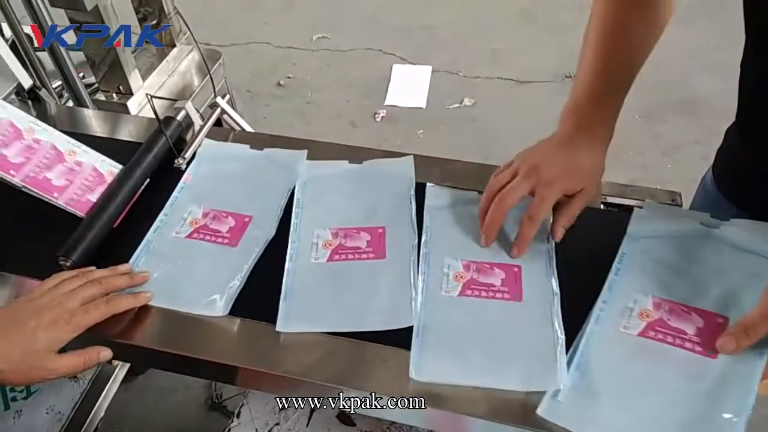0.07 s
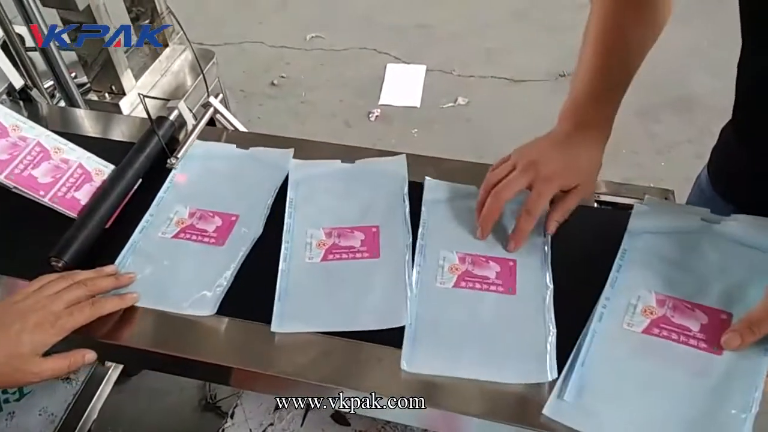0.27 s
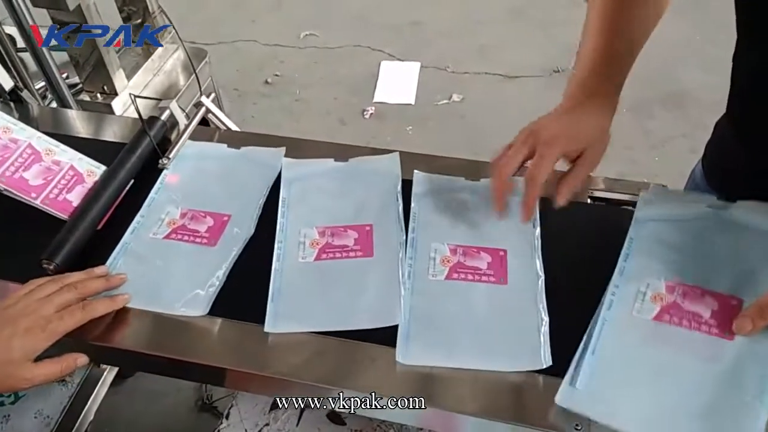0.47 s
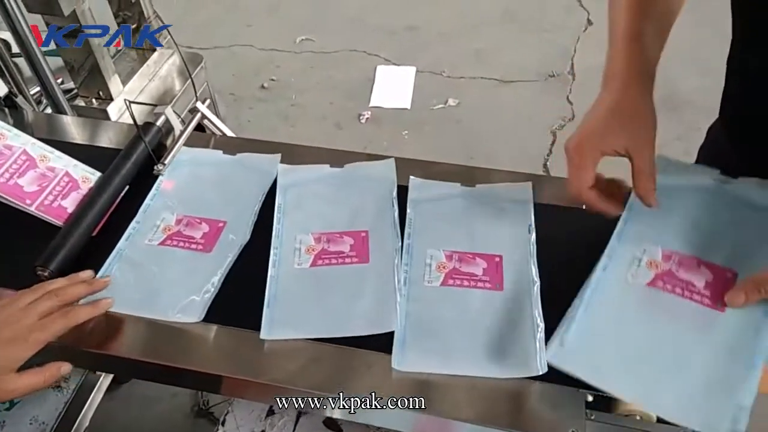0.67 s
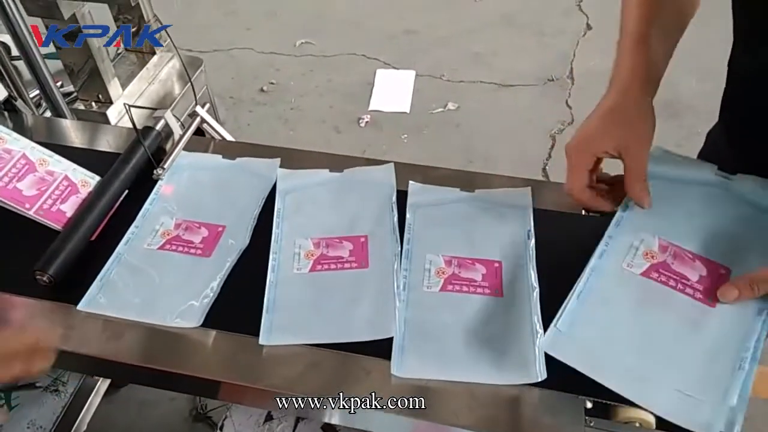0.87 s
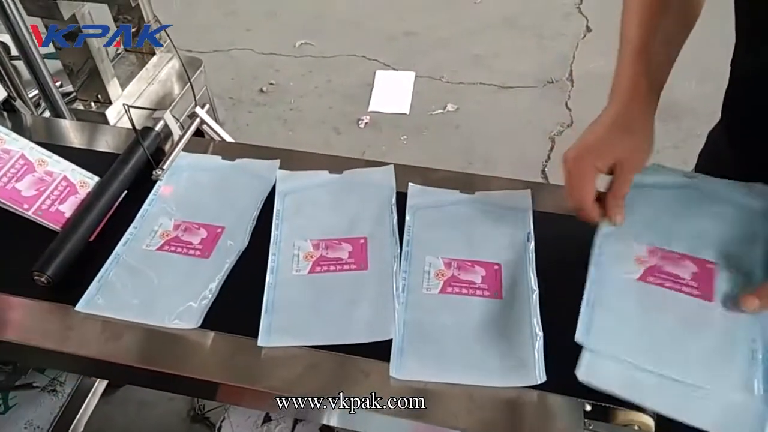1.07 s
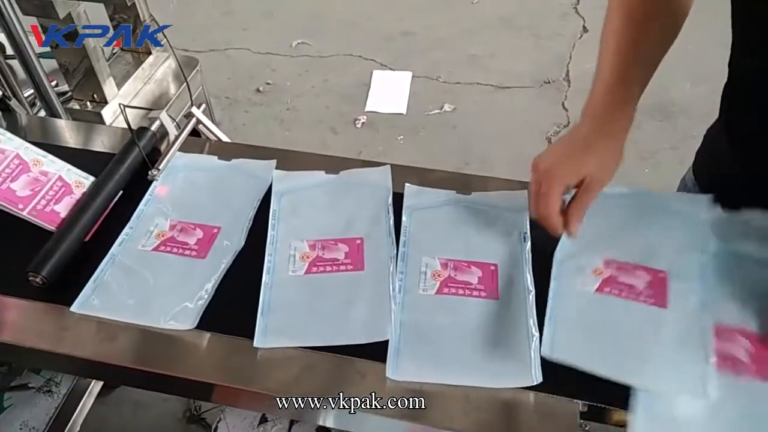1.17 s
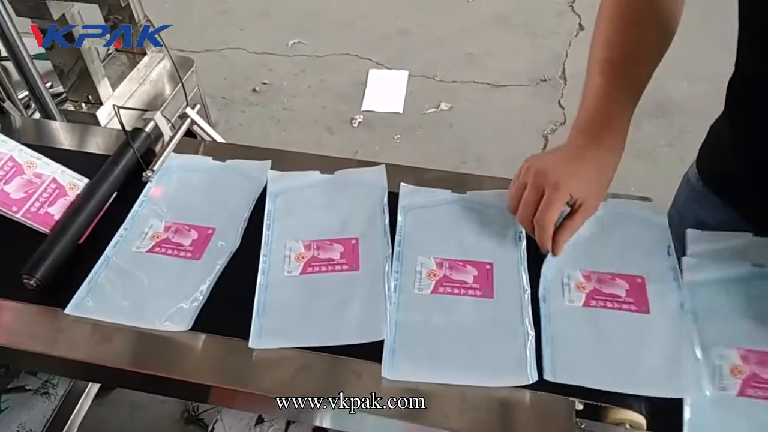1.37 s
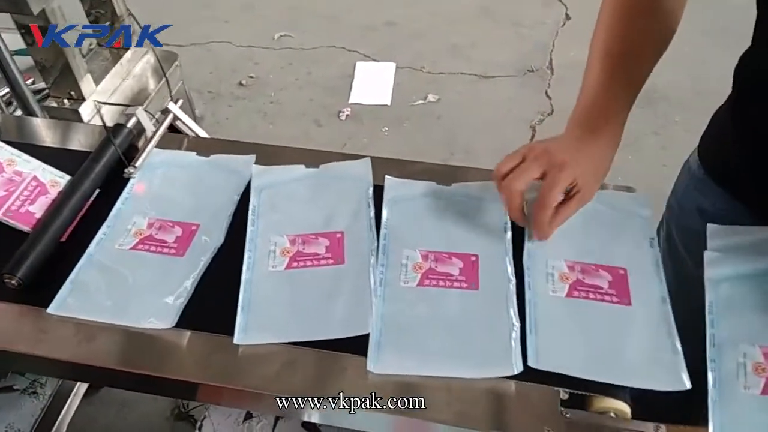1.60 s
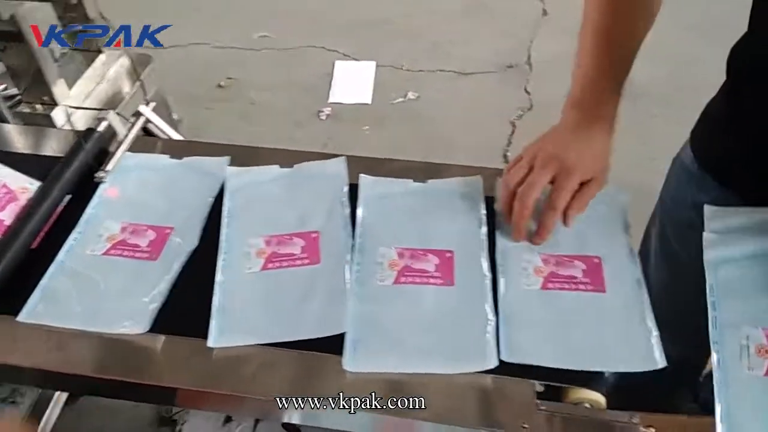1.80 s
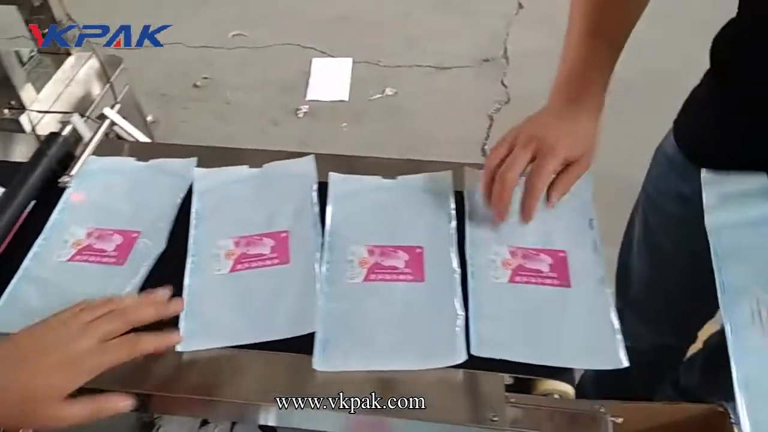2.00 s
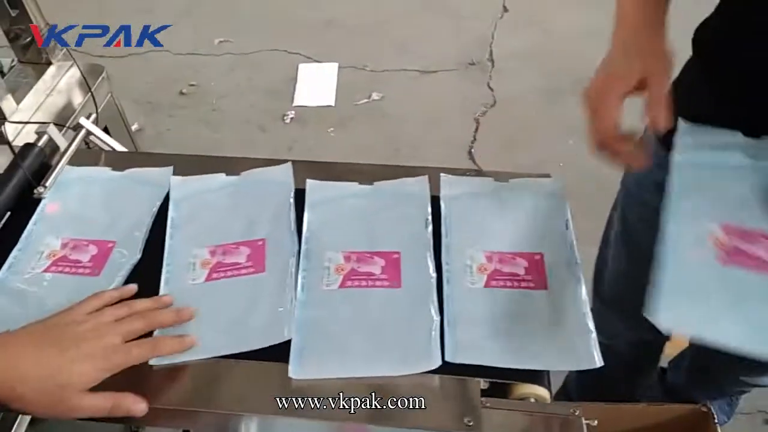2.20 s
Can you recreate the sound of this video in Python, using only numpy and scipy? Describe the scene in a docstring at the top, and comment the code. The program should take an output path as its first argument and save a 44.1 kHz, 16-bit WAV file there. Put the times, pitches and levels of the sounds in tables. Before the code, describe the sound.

A pneumatic labelling machine clacks sharply at about 0.2 seconds and releases a bright burst of air, ending with a second clack just before 0.4 seconds. Its steel frame rings briefly in the echoing workshop. From 0.5 to 1 second plastic bags faintly slide and crinkle, with a small rustle and tick near 1.4 seconds. A quiet motor hum and thin hiss continue throughout.

```python
"""Pneumatic labeller, one stroke.

A part hits its stop with a sharp clack, exhaust air bursts out, and the return stroke clacks again.
Blows and air set the steel frame ringing; the workshop reverberates. Plastic bags are slid along
the belt and picked up, over a motor hum and a thin, slowly swelling hiss."""
import sys
import numpy as np
from scipy import signal
from scipy.fft import rfft, irfft
from scipy.io import wavfile
from scipy.ndimage import uniform_filter1d

SR = 44100
rng = np.random.default_rng(int(sys.argv[2]) if len(sys.argv) > 2 else 0)


def store_wav(level_fs):
    """Save 16-bit WAV to argv[1]."""
    pcm = np.round(np.clip(np.atleast_2d(level_fs), -1, 1) * 32767)
    wavfile.write(sys.argv[1], SR, pcm.T.astype(np.int16))


N = 99225
T = np.arange(N) / SR


def undb(db):
    """dB to gain."""
    return 10 ** (np.asarray(db) / 20)


def unit(x):
    """Scale to rms 1."""
    return x / np.sqrt(np.mean(x ** 2))


def pan(db):
    """Stereo gains; db is left minus right."""
    return unit(undb(np.array([[db], [-db]]) / 2))


def on_bins(points):
    """Interpolate (f/Hz, value) rows onto the FFT bins, in log f."""
    hz, value = np.array(points, float).T
    return np.interp(np.log(np.fft.rfftfreq(N, 1 / SR) + 1), np.log(hz), value)


def through(x, response):
    """Convolve with an impulse response."""
    return signal.fftconvolve(np.atleast_2d(x), np.atleast_2d(response), axes=1)[:, :N]


def walk(rate_hz):
    """Smooth random motion, rms 1."""
    hold = int(SR / rate_hz)
    steps = np.repeat(rng.standard_normal(512), hold)[:N]
    return unit(uniform_filter1d(uniform_filter1d(steps, hold), hold))


def swell(at, length):
    """Gaussian envelope, peak 1."""
    return np.exp(-2 * ((T - at) / length) ** 2)


def decay(t60, at=0):
    """Exponential envelope, 60 dB down t60 seconds after its onset."""
    return (T >= at) * np.exp(-np.log(1000) * np.abs(T - at) / t60)


# Left-right likeness of the sound field: f/Hz, correlation
CORRELATION = [(60, 0.98), (250, 0.76), (500, 0.28), (1000, -0.33), (2000, -0.25), (5000, 0.045)]

def noise(colour):
    """Coloured stereo noise, rms 1, near mono in the bass."""
    mid, side = rfft(rng.standard_normal((2, N)))
    correlation = np.clip(on_bins(CORRELATION), -.95, .95)
    spectrum = mid * np.sqrt(1 + correlation) + side * np.sqrt(1 - correlation) * np.array([[1], [-1]])
    return unit(irfft(spectrum * undb(on_bins(colour)), N))


def tail(t60):
    """Dense decaying stereo reflections, unit energy."""
    return unit(noise([(1, 0), (SR, 0)]) * decay(t60)) / np.sqrt(N)


def knock(colour):
    """Minimum-phase response to one blow, unit energy."""
    cepstrum = irfft(np.log(undb(on_bins(colour))), N)
    cepstrum[1:N // 2] *= 2
    cepstrum[N // 2:] = 0
    response = irfft(np.exp(rfft(cepstrum)), N)[:1024]
    return response / np.linalg.norm(response)


def impact(contacts, colour, left_lag_s=.00038, scatter_db=-2):
    """One knock per contact, arriving later on the left, plus scatter off nearby machine parts."""
    blows = np.zeros((2, N))
    for at, db, pan_db in contacts:
        left, right = undb(db) * pan(pan_db)[:, 0]
        blows[0, int((at + left_lag_s) * SR)] += left
        blows[1, int(at * SR)] += right
    direct = through(blows, knock(colour))
    return direct + undb(scatter_db) * through(direct, tail(t60=.02))


# Workshop noise spectrum: f/Hz, level/dB
SHOP_SPECTRUM = [(18, -42.5), (30, -28.5), (49, -29.5), (77, -27.5), (253, -7.5), (429, -7), (492, -1.5),
                 (552, -10.5), (814, -3.5), (1290, -6.5), (1410, -6), (1580, -7), (3450, -9), (4760, -1.5),
                 (7190, -22), (9350, -50), (15800, -120)]
SHOP_DB, SHOP_PAN_DB = -68, -.5

def shop():
    """Steady workshop noise."""
    return noise(SHOP_SPECTRUM) * undb(SHOP_DB) * pan(SHOP_PAN_DB)


# Hiss envelope: t/s, level/dB
HISS_ENVELOPE = [(0, -64), (.12, -62.5), (.2, -64), (.75, -60.5), (.95, -66), (1.15, -75.5), (1.4, -68.5),
                 (1.55, -66.5), (1.66, -62.5), (1.8, -71), (2.0, -70), (2.12, -62.5), (2.25, -64.5)]
# Hiss spectrum: f/Hz, level/dB
HISS_SPECTRUM = [(1000, -22.5), (3000, -14.5), (4100, -15), (4600, -1), (4950, 0.5), (5500, -9),
                 (6500, -19), (8000, -32)]

def hiss(flicker_db=.73):
    """Thin hiss that swells slowly and flickers slightly."""
    level_db = np.interp(T, *np.array(HISS_ENVELOPE).T) - flicker_db * walk(42)
    return noise(HISS_SPECTRUM) * undb(level_db) * pan(-2.5)


def drifting_tone(hz, drift=.004):
    """Sine with a random relative drift in pitch."""
    pitch_hz = hz * (1 + drift * walk(25.16))
    return np.sin(2 * np.pi * np.cumsum(pitch_hz) / SR)


# Motor lines: f/Hz, level/dB, pan/dB
HUM_LINES = [(122, -100, 3.5), (241, -92, -4), (319, -87, -0.5), (499, -83.5, 10), (623, -90.5, -2),
             (815, -86.5, -1.5), (947, -88, -10)]
# Brief hum tones: t/s, length/s, level/dB, f/Hz
HUM_TONES = [(0.099, 0.044, -71, 487), (0.2, .2, -76, 316), (0.247, .02, -70, 390), (0.334, .028, -62, 388),
             (0.55, .2, -73.5, 316), (0.655, 0.06, -68, 316), (1.028, 0.036, -73.5, 495),
             (1.269, 0.038, -79.5, 248), (1.695, 0.26, -81, 316)]

def motor(waver_db=2):
    """Motor hum: wavering lines and brief tonal swells."""
    hum = np.zeros((2, N))
    for hz, db, pan_db in HUM_LINES:
        line = drifting_tone(hz) * undb(waver_db * walk(8.5))
        hum += unit(line) * undb(db) * pan(pan_db)
    for at, length, db, hz in HUM_TONES:
        hum += unit(drifting_tone(hz)) * swell(at, length) * undb(db) * pan(SHOP_PAN_DB)
    return hum


# Pats: t/s, length/s, level/dB, f/Hz
BAG_PATS = [(0.647, 0.032, -72.5, 198), (0.788, 0.048, -75.5, 147), (0.822, 0.081, -80, 146),
            (1.432, 0.13, -86, 126)]

def pats():
    """A hand pats the bags: soft swells of low noise."""
    thuds = np.zeros((2, N))
    for at, length, db, hz in BAG_PATS:
        colour = [(hz / 4, -25), (hz, 0), (hz * 2, -20), (hz * 10, -70)]
        thuds += noise(colour) * swell(at, length) * undb(db)
    return thuds


# Slides: t/s, length/s, level/dB, pan/dB
BAG_SLIDES = [(0.025, .05, -66, -5), (0.52, .035, -62, -10), (0.615, 0.04, -59, -13),
              (0.695, 0.05, -61, -17), (0.79, 0.11, -70, -10), (0.95, 0.08, -78, 5)]
# Friction spectrum: f/Hz, level/dB
SLIDE_SPECTRUM = [(200, -22.5), (330, 0.5), (600, -13), (800, -5), (980, 11), (1200, -7.5), (1600, -9),
                  (3000, -25), (7000, -54.5)]

def slides(roughness_db=2.4):
    """Bags rub unevenly along the belt."""
    friction = noise(SLIDE_SPECTRUM) * undb(roughness_db * walk(48.03))
    return sum(friction * swell(at, length) * undb(db) * pan(pan_db)
               for at, length, db, pan_db in BAG_SLIDES)


# Rustles: t/s, length/s, level/dB
BAG_RUSTLES = [(1.428, .02, -68), (1.47, .04, -70)]
# Rustle spectrum: f/Hz, level/dB
RUSTLE_SPECTRUM = [(300, -27), (1500, -17), (2400, 3), (3200, -13), (5000, -3), (7000, -20)]

def rustles(grain_db=5):
    """A gripped bag gives swells of grainy noise."""
    grains = noise(RUSTLE_SPECTRUM) * unit(undb(grain_db * walk(220)))
    return sum(grains * swell(at, length) * undb(db) for at, length, db in BAG_RUSTLES)


# Crinkles: t/s, energy/dB, pan/dB, t60/s
BAG_CRINKLES = [(0.506, -19, -18, 0.1), (0.545, -29, -8, 0.094), (0.577, -26, -13.5, 0.036),
                (0.742, -32, -19, 0.065), (0.808, -35, -5, .05), (1.444, -34, -6, 0.14)]
# Crinkle spectrum: f/Hz, level/dB
CRINKLE_SPECTRUM = [(300, -33), (1500, -14), (3500, -24), (4500, -1.5), (5200, 11), (6000, -38),
                    (8000, -16.5)]

def crinkles():
    """Plastic crinkles in sudden, fast-fading bursts of bright noise."""
    plastic = noise(CRINKLE_SPECTRUM)
    return sum(plastic * unit(decay(t60, at)) / np.sqrt(N) * undb(db) * pan(pan_db)
               for at, db, pan_db, t60 in BAG_CRINKLES)


# Fingertip contact: t/s, level/dB, pan/dB
TICK_CONTACT = [(1.4394, -30.5, -4)]
# Tick spectrum: f/Hz, level/dB
TICK_SPECTRUM = [(200, -48), (1500, -36), (2400, -29), (3900, -27), (4250, -16), (4450, 1), (4700, -18),
                 (5100, -19), (6000, -32), (8000, -42)]

def fingertip():
    """A fingertip ticks once on a bag."""
    return impact(TICK_CONTACT, TICK_SPECTRUM)


def room(x, crossover_hz=2000, wet_db=-7):
    """Reverberation of the hard workshop, slightly longer in the treble."""
    low = signal.sosfilt(signal.butter(2, crossover_hz, fs=SR, output="sos"), x)
    high = signal.sosfilt(signal.butter(2, crossover_hz, "high", fs=SR, output="sos"), x)
    wet = through(low, tail(t60=.78)) + through(high, tail(t60=.81))
    return undb(wet_db) * wet * pan(-2.5)


# Steel frame modes: f/Hz, level/dB, t60/s, pan/dB
FRAME_MODES = [(315, -48, 1.6, -2), (392, -47, .4, -3), (940, -40, .12, -6), (2795, -37, .4, 0),
               (3418, -30, .3, 2), (3727, -28, .3, 2), (3826, -25, .5, 2), (4007, -27, .3, 2),
               (4300, -24, .45, 2), (4580, -21, .45, 2), (4662, -16, .5, 2), (4797, -21, .4, 2),
               (4834, -20, .55, 0), (4725, -22, .5, 2), (4950, -21, .6, 0), (5092, -22, .7, -4),
               (5211, -20, .55, 0), (5275, -18, .55, -4), (5590, -22, .45, -2), (5730, -21.5, .45, 0),
               (6128, -28, .45, 0)]

def frame(air_drive_db=-1, blow_drive_db=1, low_cut_hz=214):
    """The rush of air and the hardest contact of each clack ring the steel frame."""
    drive = undb(air_drive_db) * air_envelope() * rng.standard_normal((2, N))
    for contacts in (OUT_CONTACTS, RETURN_CONTACTS):
        at, blow_db, _ = max(contacts, key=lambda row: row[1])
        drive[:, int(at * SR)] += undb(blow_drive_db + blow_db)
    modes = np.zeros((2, N))
    for hz, db, t60, pan_db in FRAME_MODES:
        ring = np.cos(2 * np.pi * hz * T) * decay(t60)
        modes += undb(db) * pan(pan_db) * unit(ring) / np.sqrt(N)
    low_cut = signal.butter(4, low_cut_hz, "high", fs=SR, output="sos")
    return signal.sosfilt(low_cut, through(drive, modes))


AIR_START_S, AIR_STOP_S, AIR_ATTACK_S, AIR_RELEASE_S = .214, .39, .002, .032
AIR_DB, AIR_SAG_DB_PER_S, AIR_SURGE_DB = -40.3, -11, 5

def air_envelope():
    """The exhaust opens, sags as pressure falls, surges as the piston runs home, then shuts."""
    opening = np.clip((T - AIR_START_S) / AIR_ATTACK_S, 0, 1)
    closing = np.exp(-np.maximum(T - AIR_STOP_S, 0) / AIR_RELEASE_S)
    sag_db = AIR_SAG_DB_PER_S * (T - AIR_START_S)
    surge_db = AIR_SURGE_DB * swell(at=.348, length=.02)
    return opening * closing * undb(AIR_DB + sag_db + surge_db)


# Air jet spectrum: f/Hz, level/dB
JET_SPECTRUM = [(88, -77), (150, -45), (306, -18), (466, -25), (966, -20.5), (1210, -36), (1400, -14.5),
                (1880, -21.5), (2070, -15), (2630, -17), (3000, -7), (4640, 0.5), (5640, -1), (7190, -18),
                (9350, -51), (15800, -120)]

def exhaust(flutter_db=2.4, housing_t60_s=.03):
    """A fluttering air jet, coloured by reflections inside the machine."""
    jet = unit(noise(JET_SPECTRUM)[0]) * air_envelope() * undb(flutter_db * walk(119.04))
    return through(jet, tail(housing_t60_s)) * pan(-.5)


# Contacts, outward and return: t/s, level/dB, pan/dB
OUT_CONTACTS = [(0.2052, -24.5, 5.5), (0.2076, -21, 6), (0.2097, -1, 2.5), (0.2104, -3.5, 5.5),
                (0.2110, 1.5, 10.5), (0.2126, -3, 0), (0.2140, -3, 5), (0.2284, -14, 8), (0.2298, -14, 8),
                (0.2336, -15, 6.5)]
RETURN_CONTACTS = [(0.3612, -24, 1), (0.3636, -16, 2), (0.3648, -2.5, 7), (0.3675, -6.5, 2),
                   (0.3775, -19, 3), (0.3816, -20, 3)]
# Clack spectra, outward and return: f/Hz, level/dB
OUT_SPECTRUM = [(88, -90), (150, -62), (634, -36), (782, -24.5), (920, -4), (1400, -22.5), (1650, -42),
                (2170, -28), (2590, -26.5), (2770, -25), (3050, -12.5), (3400, -3), (4010, -8), (4870, 1),
                (5550, -1.5), (6630, -25), (7190, -29), (9350, -22), (14500, -19), (16500, -60.5)]
RETURN_SPECTRUM = [(88, -66.5), (150, -36.5), (337, -25), (655, -33.5), (821, -15), (1150, -2), (1400, -16),
                   (1750, -21), (2070, -11), (2720, -17), (3000, -9.5), (3580, -22.5), (4720, 4.5),
                   (5730, -3), (6120, -10), (6850, -14.5), (7190, -17), (9350, -38), (15800, -120)]

def clacks():
    """The moving part hits its stop and chatters, once at each end of travel."""
    return impact(OUT_CONTACTS, OUT_SPECTRUM) + impact(RETURN_CONTACTS, RETURN_SPECTRUM)


# Stereo balance of the stroke: f/Hz, pan/dB
STROKE_PAN = [(200, -13.5), (400, -20), (600, -4), (900, -19), (1300, -2), (3000, -0.5), (4500, 2),
              (5200, -5), (6500, 1)]

def stroke():
    """Clacks and exhaust, each frequency leaning left or right at constant power."""
    pan_db = on_bins(STROKE_PAN)
    gains = undb(np.array([pan_db, -pan_db]) / 2)
    gains /= np.sqrt(np.mean(gains ** 2, axis=0))
    return irfft(rfft(clacks() + exhaust()) * gains, N)


def scene():
    """One stroke with room and frame ringing, over bags and background."""
    direct = stroke()
    labeller = direct + room(direct) + frame()
    bags = pats() + slides() + rustles() + crinkles() + fingertip()
    background = shop() + hiss() + motor()
    return background + bags + labeller


def record(dry, ceiling=.48, top_hz=7020):
    """Soft peak limiting, then a steep low-pass."""
    limited = ceiling * np.tanh(dry / ceiling)
    return signal.sosfilt(signal.ellip(8, .3, 54, top_hz, fs=SR, output="sos"), limited)


dry = scene()
out = record(dry)
store_wav(out)
```